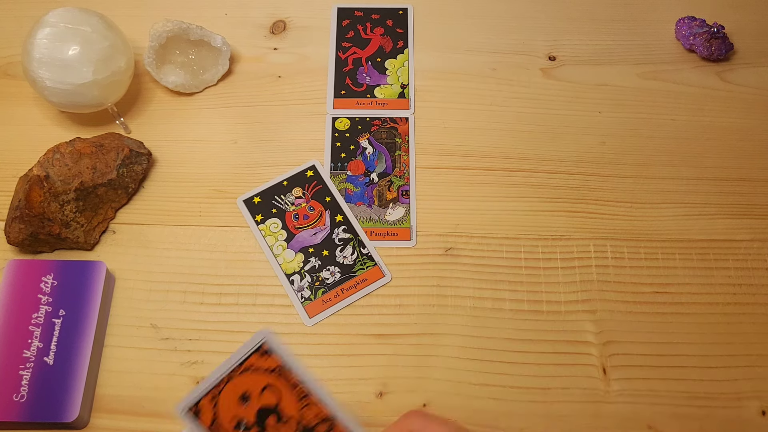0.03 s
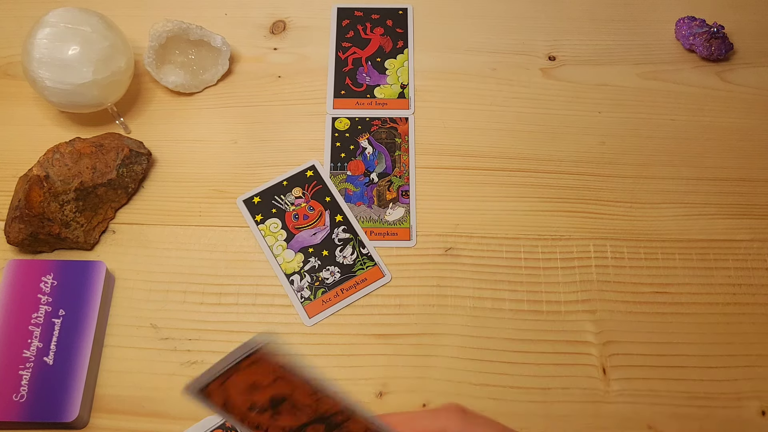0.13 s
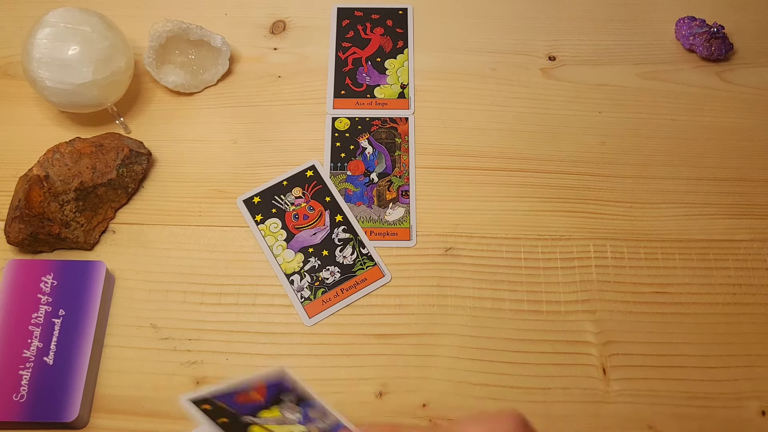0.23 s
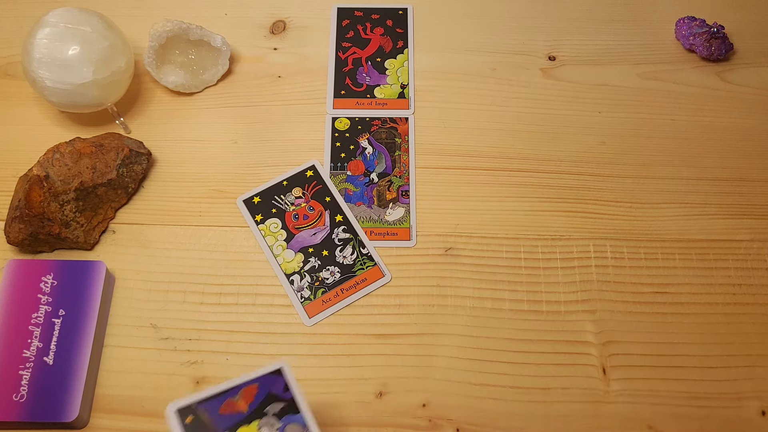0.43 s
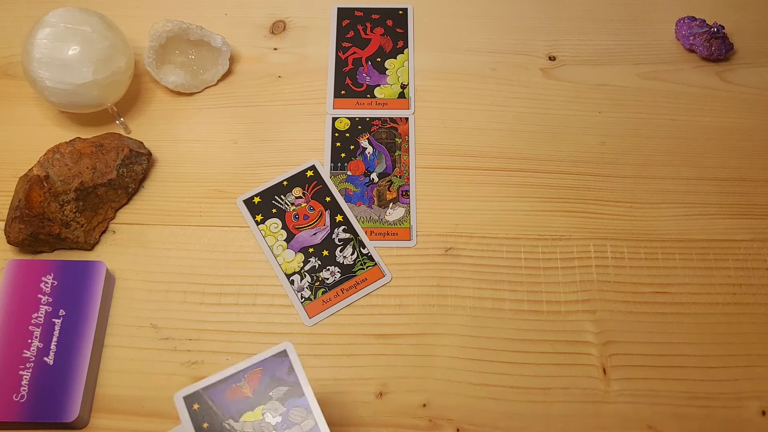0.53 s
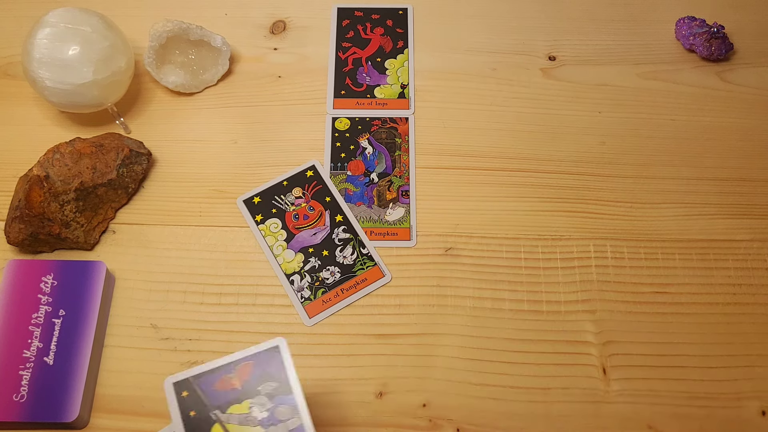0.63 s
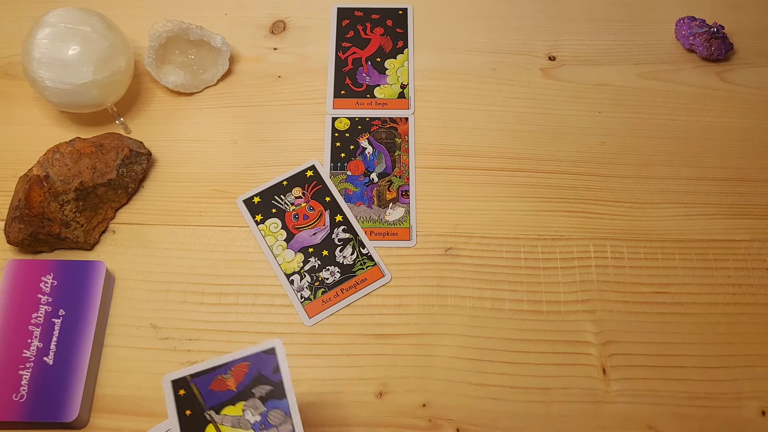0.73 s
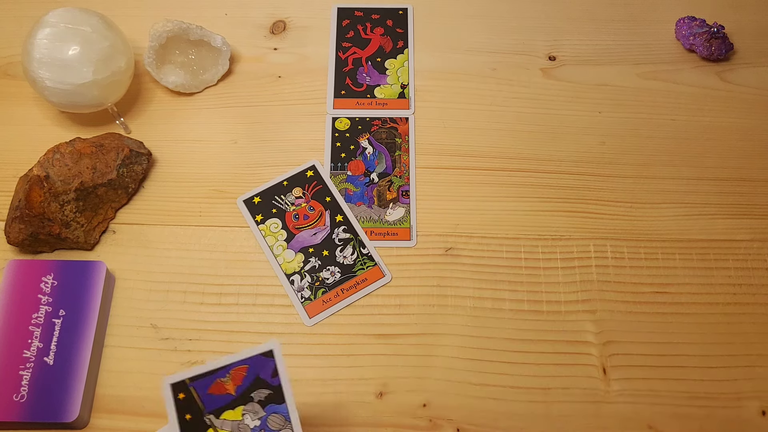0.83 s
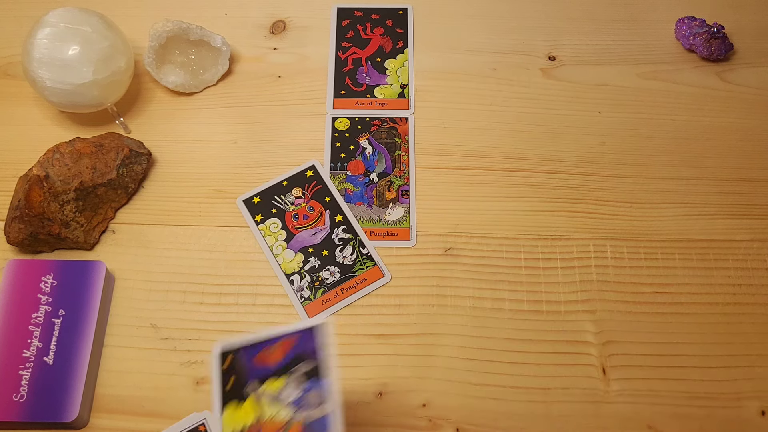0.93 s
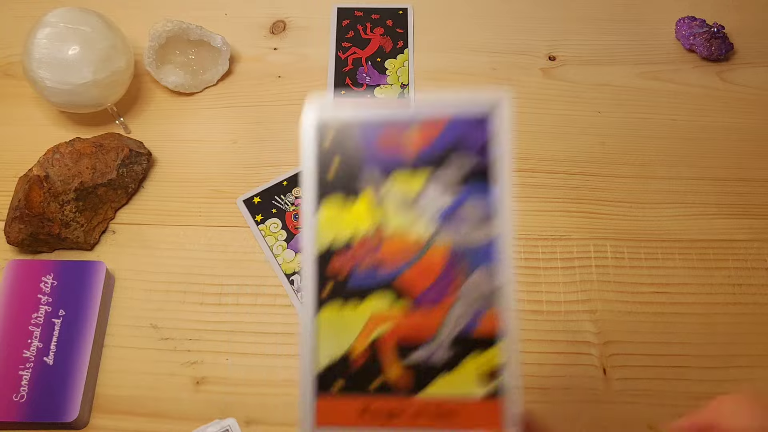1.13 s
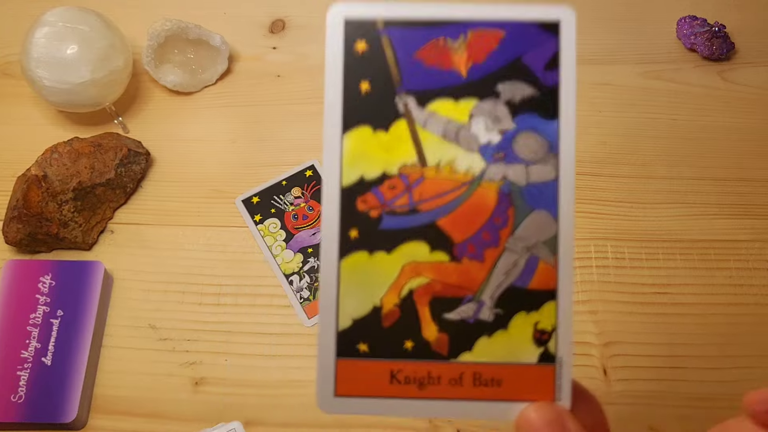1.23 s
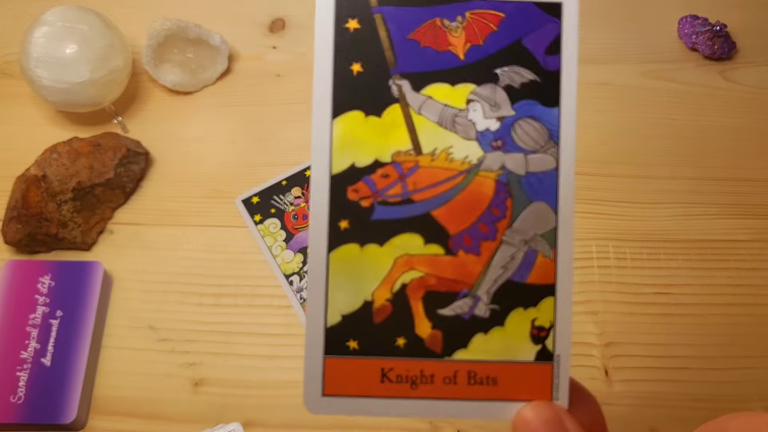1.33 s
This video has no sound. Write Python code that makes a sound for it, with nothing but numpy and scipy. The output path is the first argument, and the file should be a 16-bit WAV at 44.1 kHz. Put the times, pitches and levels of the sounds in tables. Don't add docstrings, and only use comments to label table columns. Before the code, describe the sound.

Three crisp card snaps, the first loudest and the third softer and more ringing, come between short papery slides; quiet rubbing, tiny corner ticks and dull table rumble follow, heard close up in a small room.

```python
import sys
import numpy as np
from scipy import signal
from scipy.fft import rfft, irfft
from scipy.io import wavfile

SR = 44100
rng = np.random.default_rng(int(sys.argv[2]) if len(sys.argv) > 2 else 0)


def wrap_up_sound(samples):
    columns = np.atleast_2d(samples).T
    tamed = np.clip(columns, -1, 1)
    steps = np.round(tamed * 32767).astype(np.int16)
    wavfile.write(sys.argv[1], SR, steps)


def convert_level_to_amplitude(level_db):
    exponent = np.asarray(level_db, float) / 20
    return 10 ** exponent


N = 61739
T = np.arange(N) / SR
ATTACK_S = 0.00036

# (t/s, level/dB, flurry t60/s, ring share/dB, push t60/s)
SNAPS = [
    (0.0783, -18, 0.047, 0.5, 0.012),
    (0.3301, -21.5, 0.036, 0, 0.01),
    (0.4515, -26, 0.058, 4.5, 0.0075),
]
# (f/Hz, level/dB per Hz)
EDGE_A = [(150, -46), (400, -7), (1300, -4), (2500, -9.5), (5000, -15), (6000, -4.5), (8300, -7.5),
          (16000, -35.5)]
EDGE_B = [(80, -15.5), (300, 0), (900, -4), (1800, 0), (5000, -9), (6200, -2), (11000, -13), (16000, -42)]
EDGE_C = [(200, -24), (800, -5.5), (1800, -5.5), (3000, -8.5), (5000, -15), (7200, -9), (10500, -25),
          (16000, -45)]
EDGES = (EDGE_A, EDGE_B, EDGE_C)


def level(x, db):
    return x * convert_level_to_amplitude(db) / np.sqrt(np.mean(x ** 2) + 1e-30)


def burst(x, db):
    return x * convert_level_to_amplitude(db) / np.sqrt(np.sum(x ** 2) / (SR / 100))


def curve(table):
    s, db = np.array(table, float).T
    return convert_level_to_amplitude(np.interp(T, s, db, -200, -200))


def colour(x, table):
    hz, db = np.array(table, float).T
    log_bins = np.log(np.arange(1025) * SR / 2048 + 1)
    log_gain = np.interp(log_bins, np.log(hz), db) * np.log(10) / 20
    cepstrum = irfft(log_gain)
    cepstrum[1:1024] *= 2
    cepstrum[1025:] = 0
    impulse = irfft(np.exp(rfft(cepstrum)))
    return signal.fftconvolve(x, impulse)[:len(x)]


def ring(x, hz, t60):
    decay = np.log(1000) / (max(t60, .002) * SR)
    pole = np.exp(2j * np.pi * hz / SR - decay)
    return signal.lfilter([1], [1, -pole], x).imag * np.sqrt(1 - abs(pole) ** 2)


def mode(x, hz, t60):
    skirt_cycles = 5.8
    broad = ring(np.diff(x, prepend=0), hz, skirt_cycles / hz)
    return ring(broad, hz, t60)


def grains(per_s, spread_db, count=N):
    u = rng.random((3, count))
    happens = u[0] < per_s / SR
    size = convert_level_to_amplitude(-spread_db * np.log(1 - u[2]))
    return level(happens * np.sign(u[1] - .5) * size, 0)


def flurry(s, t60, rise=ATTACK_S, hold=0):
    clicks = grains(per_s=12000, spread_db=2.5)
    t = np.maximum(T - s, 0)
    attack = 1 - np.exp(-t / rise)
    decay = convert_level_to_amplitude(-60 * np.maximum(t - hold, 0) / t60)
    return clicks * attack * decay


def hush():
    # (f/Hz, level/dB per Hz)
    hush_tone = [(40, -14.5), (120, -7), (700, -8), (2300, -14), (3100, -6), (6800, -12.5), (8000, -27),
                 (16000, -29.5)]
    return level(colour(rng.standard_normal(N), hush_tone), -67.5)


def rumble():
    # (t/s, level/dB)
    weight = [(0, -73), (.2, -71), (.4, -76), (.6, -71), (.8, -74), (.94, -68.5), (1.02, -80),
              (1.22, -80.5), (1.4, -75)]
    # (f/Hz, level/dB per Hz)
    table_tone = [(25, -20), (60, -2), (130, 0), (300, -10.5), (1000, -49.5)]
    return level(colour(rng.standard_normal(N), table_tone), 0) * curve(weight)


def bumps():
    push_s = 0.03
    # (t/s, level/dB, f/Hz, t60/s)
    knocks = [(0.055, -58.5, 74, 0.091), (0.113, -47.5, 290, 0.047), (.1, -48.5, 149, 0.095),
              (0.336, -56, 75, 0.1), (0.456, -48.5, 94, 0.13), (0.67, -65.5, 72, .2),
              (0.738, -75.5, 318, 0.072), (0.77, -74, 110, 0.2), (1.3, -61.5, 146, 0.12),
              (1.388, -58, 58, 0.1)]
    out = 0
    for s, db, hz, t60 in knocks:
        soft_push = ring(flurry(s, push_s), hz, 1.7 / hz)
        out = out + burst(ring(soft_push, hz, t60), db)
    return out


def rubs():
    lets_go_s, fade_s = .897, .004
    # (t/s, level/dB)
    rub_1 = [(0.541, -85), (.56, -83), (.575, -54.5), (.6, -52), (.61, -59.5), (.635, -74)]
    rub_2 = [(.85, -104), (.866, -60.5), (.878, -46.5), (.884, -52), (.89, -47.5), (.899, -63.5),
             (.92, -60.5), (1.07, -68.5), (1.2, -103.5)]
    rustle = [(0, -54), (.2, -60), (.3, -63.5), (.5, -64), (.7, -65.5), (.85, -66), (1.099, -69.5),
              (1.4, -72)]
    # (f/Hz, level/dB per Hz)
    rub_1_tone = [(300, -13.5), (1600, -1), (2600, -6), (5500, -8), (7400, 1), (9500, -7.5), (11500, -17),
                  (16000, -35)]
    rub_2_tone = [(300, -13.5), (1900, -11), (2300, -17), (2700, -3.5), (4000, -2.5), (9500, -7),
                  (10800, -19.5), (16000, -35)]
    rustle_tone = [(200, -10.5), (700, -3), (1900, 1.5), (2300, -6), (2900, -2.5), (7500, -3), (10500, -8),
                   (16000, -25)]
    # (f/Hz, width/Hz, level/dB)
    held_rings = [(4020, 100, -9), (5000, 210, -16), (6730, 380, -19), (8420, 350, -11)]

    skin = [grains(per_s=16000, spread_db=1.5) for _ in range(3)]
    held = sum(level(mode(skin[1], hz, 2.2 / width), db) for hz, width, db in held_rings)
    held = held * np.exp(-np.maximum(T - lets_go_s, 0) / fade_s)
    out = held * curve(rub_2)
    strokes = (rub_1, rub_2, rustle)
    tones = (rub_1_tone, rub_2_tone, rustle_tone)
    for friction, stroke, tone in zip(skin, strokes, tones):
        out = out + level(colour(friction, tone), 0) * curve(stroke)
    return out


def slides():
    # (t/s, level/dB)
    slide_1 = [(0, -45.5), (.035, -47.5), (.056, -55.5), (.076, -49), (.082, -69), (.09, -86)]
    slide_2 = [(.28, -101), (.3, -61), (.311, -41), (.32, -47), (.329, -48), (.335, -55), (.39, -66),
               (.44, -56), (.452, -47), (.46, -82)]
    # (f/Hz, level/dB per Hz)
    hiss_tone = [(200, -17.5), (500, -19.5), (900, -21.5), (1650, 1.5), (3500, -3), (8400, -2.5),
                 (11000, -10.5), (16000, -35)]
    # (f/Hz, width/Hz, level/dB)
    free_rings = [(1664, 43, 3), (1237, 64, 0.5), (3070, 320, -4), (4300, 200, -8), (5760, 500, -13.5),
                  (8400, 900, -14.5)]

    stick_slip = grains(per_s=3500, spread_db=2)
    rings = sum(level(mode(stick_slip, hz, 2.2 / width), db) for hz, width, db in free_rings)
    hiss = level(colour(stick_slip, hiss_tone), 6)
    return level(hiss + rings, 0) * (curve(slide_1) + curve(slide_2))


def ticks():
    tick_times = [.0712, .3036, .3116, .3750, .589, .7410, .7450, .7485, 1.052]
    # (level/dB, flurry t60/s, resonance f/Hz, treble level/dB, ring t60/s)
    corners = [(-39.5, 0.066, 4250, -26, 0.017), (-50, 0.056, 1720, -15, 0.012),
               (-43, 0.09, 1830, 2.5, .008), (-54, 0.022, 4000, 9, .003), (-58, 0.11, 907, -6, 0.028),
               (-59.5, 0.069, 1100, 2, 0.026), (-62.5, .05, 900, -1, 0.033), (-61.5, 0.022, 2920, 2, 0.01),
               (-69.5, 0.023, 8800, 2, .003)]
    # (f/Hz, level/dB per Hz)
    tick_tone = [(150, -37.5), (500, -1), (1500, 3), (4000, 2), (6500, 2), (9500, -4.5), (12000, -14.5),
                 (16000, -31.5)]
    out = 0
    for s, (db, t60, hz, treble_db, ring_t60) in zip(tick_times, corners):
        hit = flurry(s, t60)
        out = out + burst(mode(hit, hz, ring_t60), db)
        out = out + burst(colour(hit, tick_tone), db + treble_db)
    return out


def slips():
    # (t/s, snap number, level/dB, t60/s)
    catches = [(0.0796, 0, -26, 0.008), (0.0833, 0, -28.5, 0.004), (0.0933, 0, -42, 0.024),
               (.3313, 1, -29, 0.003), (0.3363, 1, -36.5, 0.0039), (.3444, 1, -39.5, .006),
               (0.4619, 2, -41, 0.016), (0.4727, 2, -49, 0.014)]
    out = 0
    for s, snap, db, t60 in catches:
        out = out + burst(colour(flurry(s, t60), EDGES[int(round(snap))]), db)
    return out


def cracks():
    # (level under the snap/dB, t60/s)
    fronts = [(-15, 0.033), (-13, 0.005), (-25, 0.0038)]
    # (f/Hz, level/dB per Hz)
    crack_tone = [(500, -36), (1500, -10.5), (4000, 2), (9000, 4), (12000, -10.5), (14000, -20),
                  (16000, -43.5)]
    out = 0
    for (s, snap_db, *_), (db, t60) in zip(SNAPS, fronts):
        out = out + burst(colour(flurry(s, t60, rise=0.0004), crack_tone), snap_db + db)
    return out


def snaps():
    # (f/Hz, level/dB, t60/s)
    card_a = [(267, -9.5, 0.059), (371, 3.5, 0.082), (519.8, 2.5, 0.12), (494, -8.5, 0.22),
              (643, -6.5, 0.0603), (792, -1, 0.087), (964.5, -5, 0.14), (1114, 3, 0.049), (1260, 1, 0.037),
              (1682, 1.5, 0.024), (1692, -7, 0.1), (3100, -7, 0.037), (6040, -13.5, 0.016),
              (7870, -9, 0.0039)]
    card_b = [(134.6, -3, 0.045), (242, -1.5, 0.1), (277.5, 2, 0.064), (436, -2, 0.059), (546, -4, 0.17),
              (716, -9, 0.095), (1091, 2, 0.074), (1340, -1.5, 0.056), (1699, 5, 0.054),
              (8580, 4.5, 0.0068), (2490, -20, 0.044), (2905, -2.5, 0.095), (4060, 1, 0.067),
              (6230, -10, 0.024)]
    card_c = [(407, -4.5, 0.035), (698, -16.5, 0.051), (793, -5, 0.048), (1242, -2, 0.063),
              (1723, 9, 0.029), (574, -11.5, 0.04), (2400, -24, 0.038), (5850, -19, .03),
              (6680, -4.5, 0.065), (3058, -1, 0.082), (3880, -1, 0.014), (7720, -6.5, 0.016),
              (9800, -13.5, 0.11)]
    # (rise/s, hold/s)
    drags = [(.0012, 0.0065), (.002, 0.0087), (.004, .012)]
    push_holds = [.0005, 0.00093, 0.0017]

    edges, rings = 0, 0
    cards = (card_a, card_b, card_c)
    for snap, drag, push_hold, card, edge in zip(SNAPS, drags, push_holds, cards, EDGES):
        s, db, t60, ring_db, push_s = snap
        rise, hold = drag
        edges = edges + burst(colour(flurry(s, t60, rise, hold), edge), db - 7.0)
        modes = 0
        for hz, mode_db, mode_t60 in card:
            push = flurry(s, push_s, ATTACK_S, push_hold)
            modes = modes + burst(mode(push, hz, mode_t60), mode_db)
        rings = rings + burst(modes, db - 5.5 + ring_db)
    return edges, rings


def room(x):
    tail_db, gap_s = -16.5, 0.0097
    # (f/Hz, t60/s)
    band_t60 = [(125, 0.73), (500, 0.37), (2000, 0.26), (6000, 0.17), (12000, 0.029)]
    t = T[:SR // 2]
    tail = 0
    for hz, t60 in band_t60:
        band = [hz / 1.8, min(hz * 1.8, 20000)]
        sos = signal.butter(2, band, "band", fs=SR, output="sos")
        tail = tail + signal.sosfilt(sos, rng.standard_normal(len(t))) * convert_level_to_amplitude(-60 * t / t60)
    tail = tail * np.clip(t / gap_s, 0, 1) ** 2
    return signal.fftconvolve(x, tail * convert_level_to_amplitude(tail_db) / np.sqrt(np.sum(tail ** 2)))[:N]


def scene():
    ring_to_room_db, low_cut_hz = -11, 80
    edges, rings = snaps()
    light = edges + cracks() + ticks() + slides() + rubs() + slips()
    cards = light + rings + room(light + convert_level_to_amplitude(ring_to_room_db) * rings)
    cards = signal.sosfilt(signal.butter(2, low_cut_hz, "high", fs=SR, output="sos"), cards)
    return (cards + bumps() + hush() + rumble())[None]


def band_limit(x):
    return signal.sosfilt(signal.butter(12, 16530, fs=SR, output="sos"), x)


def record(dry):
    top_hz = 16050
    mix = signal.sosfilt(signal.ellip(8, .2, 70, top_hz, fs=SR, output="sos"), dry)
    return band_limit(mix)


dry = scene()
out = record(dry)
wrap_up_sound(out)
```